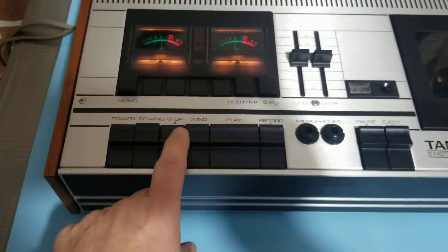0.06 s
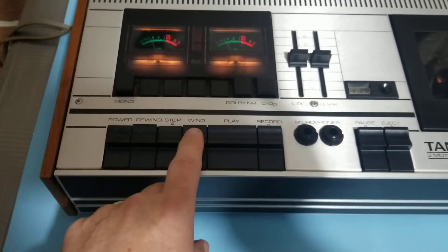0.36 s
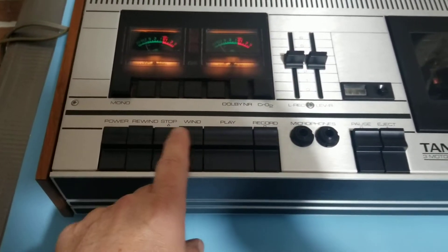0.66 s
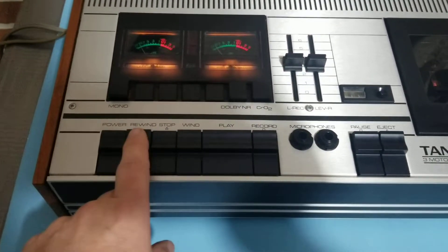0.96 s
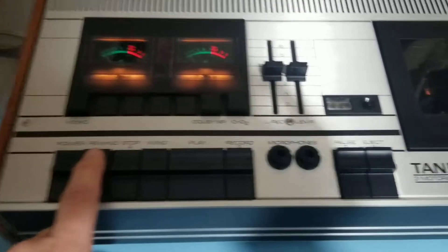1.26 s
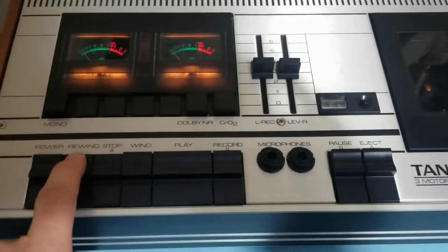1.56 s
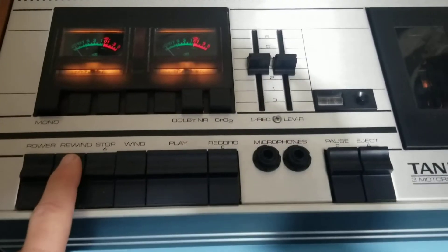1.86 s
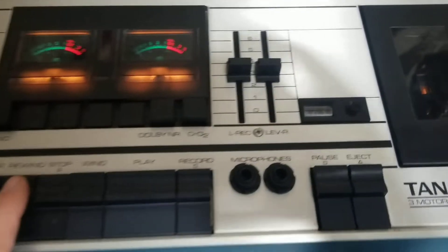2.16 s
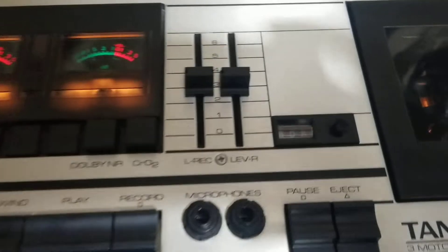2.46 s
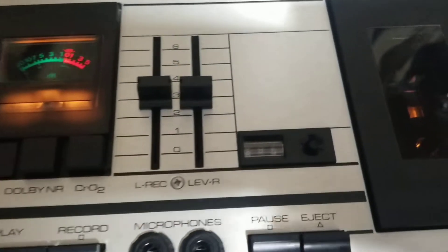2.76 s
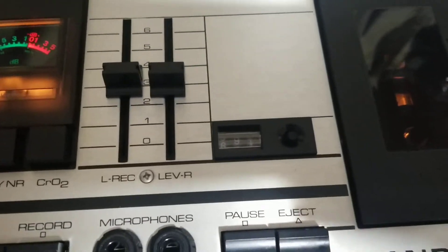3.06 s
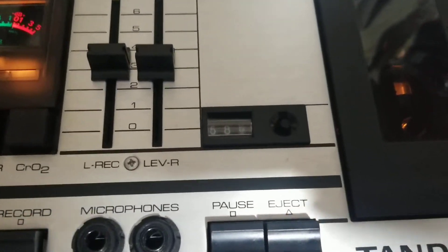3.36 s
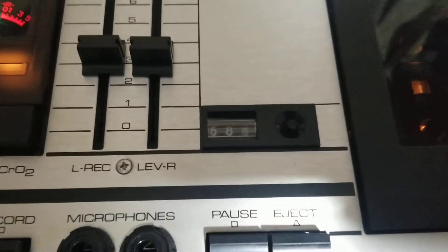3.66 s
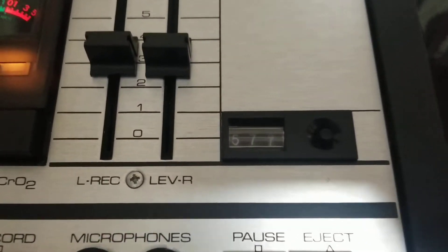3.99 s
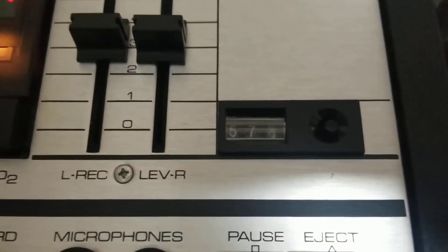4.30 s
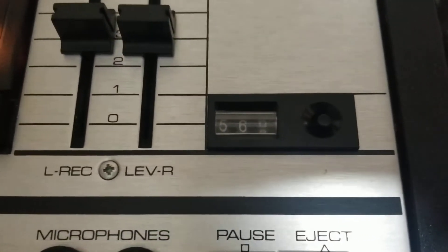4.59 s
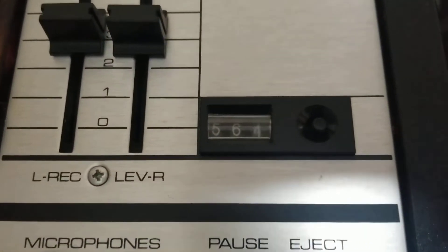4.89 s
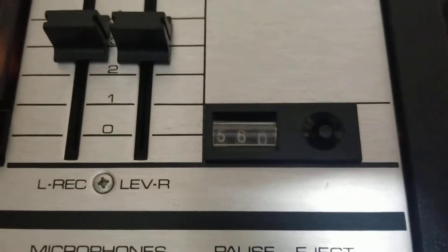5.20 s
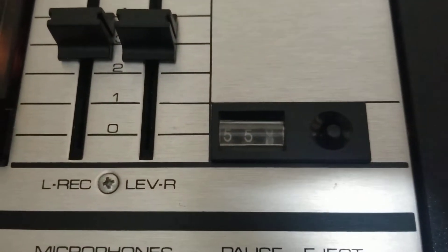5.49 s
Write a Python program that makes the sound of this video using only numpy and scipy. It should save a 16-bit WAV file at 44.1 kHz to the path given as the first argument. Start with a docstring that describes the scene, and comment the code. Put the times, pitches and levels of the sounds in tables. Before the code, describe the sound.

A cassette deck is heard up close in a small, quiet room. At the very start a light key clack dies away over a faint low motor hum. Around 1 second there is a soft tap and the faint brush of a fingertip on plastic, followed by a low handling bump at 1.3 seconds. At 1.5 seconds the rewind key latches with a sharp clack and a tiny metallic ping, then a smaller click. From 1.7 seconds the reels spin up with a rising tape hiss and a few light ticks. By 2.2 seconds the hub chatters against the cassette shell in a fast, rasping whir. It breaks off briefly around 3 seconds and repeatedly afterward, while the hiss carries on. The hum grows from about 3.3 seconds and a low rumble swells as the microphone moves in. The winding continues to the end, around 5.5 seconds.

```python
"""A rewinding cassette's hub chatters against its shell: a fast, rasping whir that breaks off briefly
whenever the hub runs free. Leading in, one key's clack dies away, a fingertip finds the rewind key,
there is a soft handling bump, the key latches, and the reels spin up with a hiss of running tape.
Underneath, in a small quiet room, the deck's motor hums and its drive rumbles, growing as the
listener moves in."""
import sys
import numpy as np
from scipy import signal
from scipy.fft import rfft, irfft
from scipy.io import wavfile

SR = 44100
rng = np.random.default_rng(int(sys.argv[2]) if len(sys.argv) > 2 else 0)


def store_pcm(level_fs):
    """Save levels as 16-bit WAV."""
    pcm = np.round(np.clip(level_fs, -1, 1) * 32767).astype(np.int16)
    wavfile.write(sys.argv[1], SR, np.atleast_2d(pcm).T)


N = 244314
TIME, FREQ = np.arange(N) / SR, np.fft.rfftfreq(N, 1 / SR)

# colour of the room tone: f/Hz, level/dB
AIR_COLOUR = [(100, -8), (350, 0), (450, -2), (600, -12), (800, -21), (1300, -22), (2600, -30), (7000, -31),
              (8500, -44), (10000, -42), (12500, -29), (16000, -29)]
# reverb time of the room: f/Hz, t60/s
ROOM_DECAY = [(200, 0.15), (1000, 0.51), (4500, 0.4), (9000, 0.32), (16000, 0.12)]
# fader ride of the motor hum: t/s, level/dB
HUM_RIDE = [(0, -55), (3.1, -54), (3.35, -44.5), (4.5, -44.5), (5.54, -48)]
# colour of the drive's rumble in the case: f/Hz, level/dB
RUMBLE_COLOUR = [(15, -32), (28, -20), (42, -7), (52, -2), (66, 5), (90, 2.5), (108, -6), (140, -19),
                 (180, -16), (225, -21), (265, -17.5), (330, -27), (400, -25.5), (520, -47), (900, -53),
                 (3000, -85)]
# fader ride of the rumble: t/s, level/dB
RUMBLE_RIDE = [(0, -53), (4.0, -50.5), (5.1, -46.5), (5.54, -41.5)]
# case modes stirred by the reels: f/Hz, width/Hz, level/dB, share of the rumble's swell
DRONE_MODES = [(82, 17, -52.5, 1), (98.8, 10, -56.5, 1.2), (112.9, 8.3, -61.5, .8), (205.5, 13, -67, 0.8),
               (302, 18, -68.5, 0.15)]
# colour of running tape: f/Hz, level/dB
TAPE_COLOUR = [(300, -24), (600, -7), (950, -4.5), (1130, 1), (1700, -9), (2300, -3.5), (3300, -6.5),
               (4700, -0.5), (6000, -4), (9000, -14.5), (12500, -18), (15500, -19)]
# colour of skin brushing plastic: f/Hz, level/dB
SKIN_COLOUR = [(1000, -25), (4000, -9), (6500, 1), (9000, -21), (13000, -6), (16000, -7)]
# the spring catch: t/s, then its modes as f/Hz, level/dB, t60/s
LATCH_S, LATCH_MODES = 1.506, [(4220, -26, 0.03), (4520, -27, 0.025), (5060, -28.5, 0.03)]
# key clacks and a soft, low handling bump:
# t/s, level/dB, decay/s, thud against snap/dB, pan left/dB, low-pass f/Hz
KNOCK_HITS = [(0.0, -49, .04, -3.5, -5, 7800), (0.940, -59, 0.012, 4, -5.5, 9000),
              (1.311, -64, .0028, 18, -16, 15000), (1.341, -67.5, .0027, 10, -4, 7000),
              (1.499, -42, .004, -27, 1, 9100), (1.507, -24.5, .01, -18, -2, 17000),
              (1.536, -31.5, .011, -8.5, -2, 17000), (1.711, -49.5, .017, -4, -3, 11000)]
# colour of a key's plastic snap: f/Hz, level/dB
SNAP_COLOUR = [(300, -29), (700, -3), (1000, -9), (1150, -2.5), (1450, -2.5), (2100, -4), (2900, -6.5),
               (4300, -6.5), (6200, -6.5), (9300, -16), (13300, -4), (15500, -6)]
# colour of the thud in the case: f/Hz, level/dB
THUD_COLOUR = [(30, 15), (90, -12), (170, -17), (320, 9.5), (600, 5), (1400, -9), (3000, -30), (8000, -55)]
# ring of the knocked chassis: f/Hz, relative level/dB, t60/s
CHASSIS_MODES = [(310, -12, 0.12), (1164, -11, .12), (1405, 1, .12), (2360, 2, 0.11), (3330, -12, .13),
                 (4150, -1, .09), (4300, -15, .15), (4920, -9, .1), (5281, -11, .12), (6200, -2, 0.083)]
# boom of the pushed case: f/Hz, relative level/dB, t60/s
CASE_MODES = [(48, -3, 0.15), (131, -12, 0.072), (358, -0.5, .1), (570, -18, 0.1)]
# the hub rubs on the shell: start t/s, end t/s
HUB_RUBS = [(2.165, 3.04), (3.19, 3.387), (3.41, 3.599), (3.658, 3.822), (3.848, 4.114), (4.139, 4.691),
            (4.803, 4.975), (5.073, 5.188), (5.289, 5.447), (5.464, 5.7)]
# it only brushes the shell, during spin-up and between rubs: t/s, length/s, level against a rub/dB
HUB_GRAZES = [(1.913, 0.0083, -11), (1.937, 0.026, -18), (2.018, 0.0083, -17.5), (2.077, .003, -9),
              (2.094, .004, -16), (2.115, .005, -7), (2.132, .004, -12), (3.068, .016, 1),
              (3.118, 0.015, -10), (3.159, .027, -4), (3.628, 0.0045, -4.5), (4.715, 0.016, 2.5),
              (4.759, 0.0087, -1.5), (4.985, .006, -8), (5.001, 0.013, -1), (5.047, .003, 0),
              (5.209, .003, -2), (5.245, .008, -8)]
# how hard the hub presses: t/s, level/dB
HUB_PRESSURE = [(2.1, -30.5), (2.5, -28.5), (4.2, -26), (5.54, -27.5)]
# colour of the hub's friction: f/Hz, level/dB
RASP_COLOUR = [(180, -57), (300, -28), (439, -61), (571, -17), (863, -15.5), (1120, -4.5), (1730, -15.5),
               (2790, -9.5), (3070, -12.5), (4570, -5), (5210, -8.5), (5760, -5), (8700, -19), (11500, -14),
               (15500, -22.5)]
# stereo placement of that rasp: f/Hz, pan left/dB
RASP_BALANCE = [(500, -4.5), (1800, 0), (3000, 1.5), (6000, -9), (9000, -4), (12500, -5), (15000, 1)]
# stereo likeness of rasp and tape hiss: f/Hz, left-right correlation
FRICTION_LIKENESS = [(300, 0.96), (1200, 0.49), (1700, 0), (16000, 0.22)]
# cassette shell and door: f/Hz, width/Hz, relative level/dB, pan left/dB, left lead/rad, close-up gain/dB
SHELL_MODES = [(579.5, 33, -27.5, 1.5, -0.5, 0.5), (931, 83, -25.5, -11, 2.5, -6),
               (1122.4, 82, -1, 2, 0.37, -2.5), (1216, 48, -10, 2, -1, 4), (1308, 68, -9.5, 2, 0, -6),
               (1497, 48, -9, 7, 0, -7.5), (1858, 41, -16.5, 13, -4, -10), (2120, 24, -7.5, 2.5, 2, -13.5),
               (2320, 27, -11, -4, -3, 3), (2811, 52, -12, -11, 0.6, -6.5), (3260, 44, -21, -16.5, 1, -0.5),
               (3562, 38, -20.5, -10, 2.1, 10), (4103, 120, -15.5, 3, -0.8, 8.5),
               (4550, 71, -9.5, -5, -0.5, 4), (4692, 80, -5.5, -9.5, -.5, -1.5), (5600, 49, -9, -2, -1, 0),
               (5718, 126, -7, -6.5, 1.5, 7), (6210, 640, -1.5, 1, -1.5, -20),
               (7440, 310, -7.5, -2, 1, -0.5), (7986, 190, -8.5, 0.5, -5.5, -6.5)]
# the listener's path: t/s, nearness to the cassette door (0-1)
NEARNESS = [(0, 0.9), (2.9, 0.05), (4.3, 0.85), (5.54, 1)]


def amp(db):
    """Decibels to gain."""
    return 10 ** (np.asarray(db) / 20)


def unit(x):
    """Scales to rms 1."""
    return x / np.sqrt(np.mean(x ** 2) + 1e-20)


def read(points, hz=FREQ):
    """Reads a curve on a log-frequency axis."""
    f, value = np.transpose(points)
    return np.interp(np.log(hz + 1), np.log(f + 1), value)


def ride(points):
    """An automation curve, at every sample."""
    return np.interp(TIME, *np.transpose(points))


def pan(db):
    """Left and right gains; positive dB leans left."""
    return amp(np.array([np.atleast_1d(db), -np.atleast_1d(db)]) / 2)


def drift(hz):
    """Random modulation of rms 1, up to about hz."""
    size = 2 ** 13
    rolloff = np.exp(-(FREQ[:size // 2 + 1] / hz) ** 2)
    slow = irfft(rfft(rng.standard_normal(size)) * rolloff)
    return unit(np.interp(np.arange(N), np.linspace(0, N, size), slow))


def noise(colour, likeness, pan_db=0):
    """Stereo noise of rms 1 with a given colour, left-right likeness and balance."""
    left, other = rfft(rng.standard_normal((2, N)))
    right = likeness * left + np.sqrt(1 - likeness ** 2) * other
    return unit(irfft(np.array([left, right]) * pan(pan_db) * amp(read(colour)), N))


def resonate(x, hz, width, lead=0):
    """A coupled pair of modes that swells, then dies; heard with a phase lead on the left."""
    pole = np.exp((2j * np.pi * hz - np.pi * width * np.sqrt(2)) / SR)
    kept = abs(pole) ** 2
    gain = np.sqrt(2 * (1 - kept) ** 3 / (1 + kept))
    ringing = signal.lfilter([gain], [1, -2 * pole, pole ** 2], x + 1e-18)
    return (ringing * np.exp(1j * lead * np.array([[.5], [-.5]]))).real


def ring(modes, t, channels):
    """Struck modes: dying sines of random phase."""
    phases = rng.uniform(0, 2 * np.pi, (len(modes), channels, 1))
    return sum(amp(db - 60 * t / t60) * np.sin(2 * np.pi * hz * t + phase)
               for (hz, db, t60), phase in zip(modes, phases))


def room_tone(level_db=-67):
    """A faint, steady bed of air and hiss."""
    return amp(level_db) * noise(AIR_COLOUR, read([(300, 0.63), (2000, 0.56)]))


def room_reverb(x, predelay_s=.004):
    """Sparse reflections off the walls, each band dying at its own speed."""
    taps = rng.standard_normal((2, SR // 2)) * (rng.random((2, SR // 2)) < .1)
    hz, t, bands = signal.stft(taps, SR, nperseg=256)
    fade = amp(-60 * t / read(ROOM_DECAY, hz)[:, None]) * (t > predelay_s)
    tail = signal.istft(bands * fade, SR, nperseg=256)[1]
    return signal.fftconvolve(x, tail / np.linalg.norm(tail[0]), axes=1)[:, :N]


def motor_hum(start_s, idle_hz=64.5, sag_hz_per_s=1.2, waver_hz=0.43):
    """A low, wavering hum whose pitch sags once the reels pull."""
    pitch = idle_hz - sag_hz_per_s * np.maximum(TIME - start_s, 0)
    cycles = np.cumsum(pitch + waver_hz * drift(hz=3.6)) / SR
    return np.sqrt(2) * np.sin(2 * np.pi * cycles) * amp(ride(HUM_RIDE) + drift(hz=16))


def drive_rumble(drone_fade_in_s=(2.1, 2.4)):
    """The drive rumbles in the case; the turning reels add a drone that swells with it."""
    level_db = ride(RUMBLE_RIDE)
    rumble = amp(level_db) * noise(RUMBLE_COLOUR, read([(25, 0.41), (70, 0.96), (300, 0.8)]))
    fade_in = np.interp(TIME, drone_fade_in_s, [0, 1])
    swell_db = level_db - level_db.mean()
    drone = sum(amp(db + share * swell_db) * resonate(fade_in * rng.standard_normal(N), hz, width)
                for hz, width, db, share in DRONE_MODES)
    return rumble + drone


def tape_hiss(start_s, spin_up_s=0.67, full_speed_db=-42, flutter_db=1.8):
    """Tape hisses through its guides, fluttering and growing as the reels come up to speed."""
    hiss = noise(TAPE_COLOUR, read(FRICTION_LIKENESS), pan_db=-1.5)
    speed = np.clip((TIME - start_s) / spin_up_s, 0, 1)
    return speed ** 1.18 * amp(full_speed_db + flutter_db * drift(hz=70.5)) * hiss


def fingertip(peak_s=1.02, spread_s=0.025, peak_db=-73):
    """Skin brushes softly over the key tops on its way to rewind."""
    swell = np.exp(-.5 * ((TIME - peak_s) / spread_s) ** 2)
    return amp(peak_db) * swell * noise(SKIN_COLOUR, likeness=.3)


def latch_ping(pan_db=-10, attack_s=.0005):
    """The rewind key's spring catch snaps home with a metallic ping."""
    t, out = np.arange(SR // 5) / SR, np.zeros((2, N))
    ping = np.minimum(t / attack_s, 1) * ring(LATCH_MODES, t, channels=2)
    out[:, round(LATCH_S * SR):][:, :len(t)] = pan(pan_db) * ping
    return out


def knocks(ring_db=-17, boom_db=-5, hard_db=-28):
    """Key clacks and a soft, low handling bump: each layers a ringing snap over a booming thud."""
    snap, thud = noise(SNAP_COLOUR, likeness=0.12), noise(THUD_COLOUR, likeness=0.96)
    t, out = np.arange(SR // 2) / SR, np.zeros((2, N))
    for start, db, decay, thud_db, pan_db, cutoff_hz in KNOCK_HITS:
        first = round(start * SR)
        span = slice(first, first + len(t))
        attack_s = .0009 * 2 ** ((hard_db - db) / 20)  # 20 dB softer, twice as slow
        onset = np.minimum(t / attack_s, 1)
        force = onset * np.exp(-np.maximum(t - attack_s, 0) / decay)
        top = force * snap[:, span] + amp(ring_db) * onset * ring(CHASSIS_MODES, t, channels=2)
        top = signal.sosfilt(signal.butter(4, cutoff_hz, fs=SR, output="sos"), top)
        body = force * thud[:, span] + amp(boom_db) * onset * ring(CASE_MODES, t, channels=1)
        out[:, span] += amp(db) * pan(pan_db) * (top + amp(thud_db) * body)
    return out


def cassette_well(x, echo_db=-8, decay_s=.004):
    """Dense, very short reflections in the cassette well comb the sound finely."""
    t = np.arange(SR // 40) / SR
    taps = rng.standard_normal((2, len(t))) * np.exp(-t / decay_s)
    echoes = signal.oaconvolve(x, taps / np.linalg.norm(taps[0]), axes=1)[:, :N]
    return (x + amp(echo_db) * echoes) / np.hypot(1, amp(echo_db))


def hub_force(bumps_per_s=65, jitter=0.235, uneven_db=2.7, drag=0.58, grit_db=1.36):
    """While it touches, the hub drags on the shell and bumps it unevenly three times a turn."""
    attack_s, ease_s, release_s = 0.0035, .025, 0.0072
    # a rub catches 1.5 dB harder and eases off by 4 dB at its end; a graze does neither
    rubs = [(start, end - start, 0, 1.5, -4) for start, end in HUB_RUBS]
    grazes = [(*graze, 0, 0) for graze in HUB_GRAZES]
    total_power = np.zeros(N + SR)
    for start, length, db, catch_db, ease_db in rubs + grazes:
        t = np.arange(round((length + .06) * SR)) / SR
        late, size = rng.uniform(-1, 1, (2, 64))
        bump_db = uneven_db * size
        late[0], bump_db[0] = 0, catch_db
        bump_s = (np.arange(len(late)) + jitter * late) / bumps_per_s
        touching = bump_s < length
        from_peak = np.minimum(abs((t - bump_s[touching, None]) / attack_s - 1), 10)
        bumps = amp(bump_db[touching, None]) * np.exp(-.5 * from_peak ** 2)
        contact = np.exp(-np.maximum(t - length, 0) / release_s)
        power = ((bumps ** 2).sum(0) + (drag * contact) ** 2) * np.minimum(t / attack_s, 1)
        easing = np.clip(1 - (length - t) / ease_s, 0, 1)
        total_power[round(start * SR):][:len(t)] += amp(db + ease_db * easing) ** 2 * power
    return np.sqrt(total_power[:N]) * amp(ride(HUB_PRESSURE) + grit_db * drift(hz=261))


def hub_chatter(rasp_db=0.5, shell_db=-6, patchy_db=2.0, bite=0.14, firm_db=-28):
    """The hub's friction rasps and rings the shell, the mix of modes shifting from bump to bump."""
    force, near = hub_force(), ride(NEARNESS)
    friction = noise(RASP_COLOUR, read(FRICTION_LIKENESS), read(RASP_BALANCE))
    out = amp(rasp_db) * cassette_well(force * friction)
    shake = force * (force / amp(firm_db)) ** bite  # light grazes ring the shell less
    for hz, width, db, pan_db, lead, near_db in SHELL_MODES:
        drive = shake * unit(amp(patchy_db * drift(hz=69.6))) * rng.standard_normal(N)
        out += amp(shell_db + db) * pan(pan_db) * resonate(drive * amp(near_db * near), hz, width, lead)
    return out


def scene(reels_start_s=1.683, click_send_db=-15, reel_send_db=-19):
    """The deck up close, with a touch of small room on the clicks and the winding."""
    clicks = knocks() + latch_ping() + fingertip()
    winding = hub_chatter() + tape_hiss(reels_start_s)
    reverb = room_reverb(amp(click_send_db) * clicks + amp(reel_send_db) * winding)
    bed = room_tone() + motor_hum(reels_start_s) + drive_rumble()
    return bed + reverb + clicks + winding


def record(dry, cutoff_hz=15850):
    """A steep low-pass trims the very top."""
    lowpass = signal.firwin(511, cutoff_hz, window=("kaiser", 9), fs=SR)
    return signal.oaconvolve(dry, lowpass[None], "same")


dry = scene()
out = record(dry)
store_pcm(out)
```